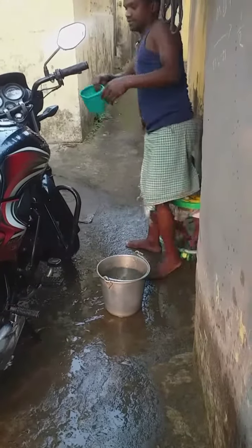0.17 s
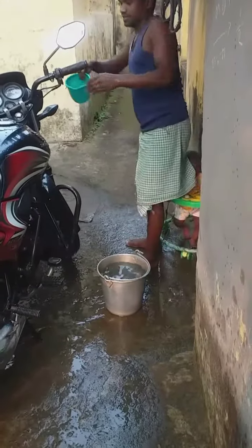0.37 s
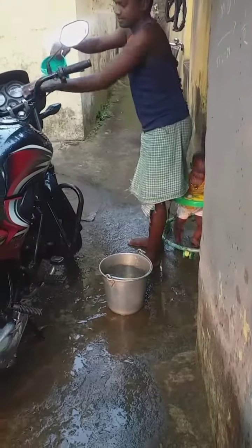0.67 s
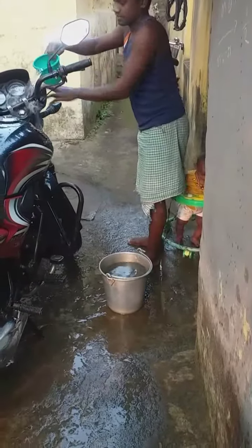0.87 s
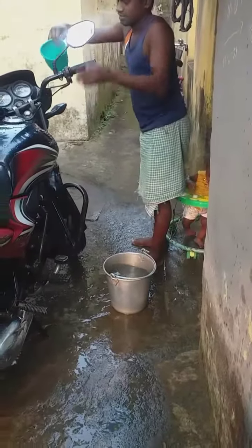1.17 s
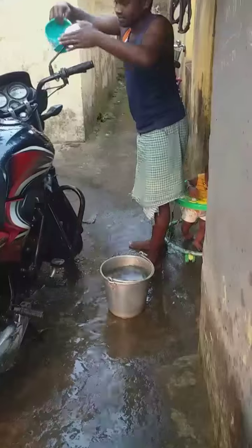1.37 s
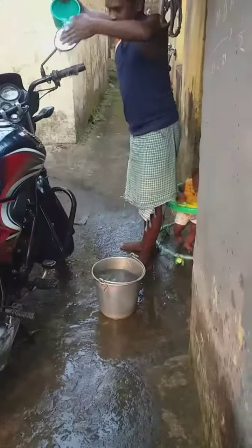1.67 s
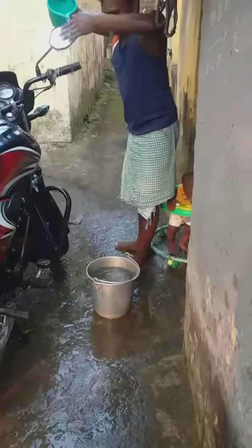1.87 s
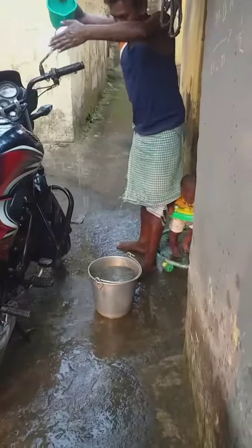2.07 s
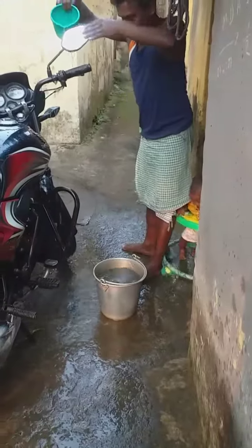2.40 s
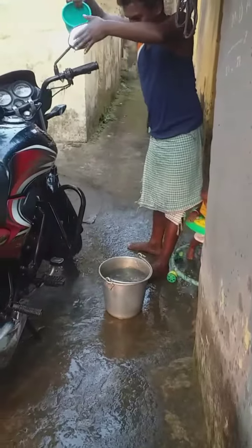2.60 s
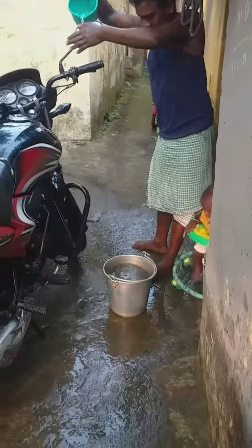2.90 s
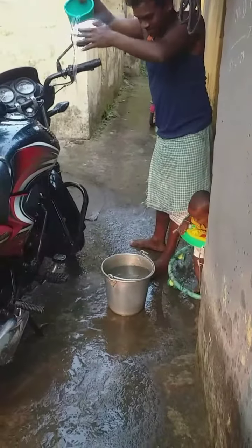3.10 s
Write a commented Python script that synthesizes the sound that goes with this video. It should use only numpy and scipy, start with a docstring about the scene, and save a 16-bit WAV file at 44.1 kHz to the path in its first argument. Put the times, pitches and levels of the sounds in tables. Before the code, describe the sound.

Water poured from a plastic mug splashes over a motorcycle in a narrow concrete alley. A light patter and a hollow plop come first, then sharper spattering, with a few faint squeaks of a wet hand on the mirror.

```python
"""A light patter, then a hollow plop: water is poured from a plastic mug over a motorcycle mirror.
Trapped air rings to make the plop; lumps and sheets of water slap and spatter on the bike and the
wet ground, while a wet hand sticks and slips on the glass in short squeaks. The walls of a narrow
concrete alley answer briefly over low outdoor air and a distant bird."""
import sys
import numpy as np
from scipy import signal
from scipy.fft import rfft, irfft, next_fast_len
from scipy.io import wavfile
from scipy.ndimage import map_coordinates

SR = 44100
rng = np.random.default_rng(int(sys.argv[2]) if len(sys.argv) > 2 else 0)


def materialize(psi):
    """Save the field psi as 16-bit PCM at rate SR to the path in sys.argv[1].

    A 1-D psi becomes a single channel; in a 2-D psi each row is a channel.
    """
    bounded = np.clip(np.atleast_2d(psi).T, -1, 1)
    quanta = np.round(bounded * 32767).astype(np.int16)
    wavfile.write(sys.argv[1], SR, quanta)


N = 143325
T = np.arange(N) / SR


def amp(db):
    """Decibels to gain."""
    return 10 ** (np.asarray(db) / 20)


def unit_rms(x):
    """Scale to rms 1."""
    return x / np.sqrt(np.mean(x ** 2) + 1e-20)


def log_interp(points, hz):
    """Read (freq_hz, value) points on a log frequency axis."""
    freqs_hz, values = np.transpose(points)
    return np.interp(np.log(hz + 1), np.log(freqs_hz + 1), values)


def curves(rows):
    """One value per sample for each column after time_s."""
    time_s, *columns = np.transpose(rows)
    return [np.interp(T, time_s, column) for column in columns]


def wobble(rate_hz, size=N):
    """Smooth random curve through rate_hz knots a second."""
    knots = rng.standard_normal(int(size * rate_hz / SR) + 4)
    return map_coordinates(knots, [np.arange(size) * rate_hz / SR])


def filtered(x, response):
    """Apply a frequency response, given as a function of Hz."""
    size = next_fast_len(len(x) + 8192)
    return irfft(rfft(x, size) * response(np.fft.rfftfreq(size, 1 / SR)), size)[:len(x)]


def coloured(x, spectrum):
    """Shape x by (freq_hz, gain_db) points, at rms 1."""
    return unit_rms(filtered(x, lambda hz: amp(log_interp(spectrum, hz))))


def band_noise(centre_hz, q, size):
    """Noise in one broad resonance with steepened skirts."""
    def response(hz):
        resonance = 1j * hz / (centre_hz ** 2 - hz ** 2 + 1j * hz * centre_hz / q)
        highpass = hz ** 2 / (hz ** 2 + (centre_hz / 2) ** 2)
        lowpass = 1 / np.hypot(1, hz / (1.48 * centre_hz))
        return resonance * highpass * lowpass

    return unit_rms(filtered(rng.standard_normal(size), response))


def grainy(x, depth_db, rate_hz):
    """Roughen x with a fast level flicker, at rms 1."""
    return unit_rms(x * amp(depth_db * wobble(rate_hz, len(x))))


def swell(t, rise_s, decay_s):
    """Smooth rise, exponential fall."""
    rise = np.sin(np.pi / 2 * np.minimum(t / rise_s, 1)) ** 2
    return rise * np.exp(-np.maximum(t - rise_s, 0) / decay_s)


def arch(progress):
    """Rounded envelope over progress 0 to 1."""
    return np.sqrt(np.abs(np.sin(np.pi * progress)))


def wavering_phase(pitch_hz, depth, rate_hz, size):
    """Phase in radians of a tone that wavers by a fraction of its pitch."""
    return 2 * np.pi * np.cumsum(pitch_hz * (1 + depth * wobble(rate_hz, size))) / SR


def add(out, start_s, x):
    """Mix x into out at start_s."""
    part = out[round(start_s * SR):][:len(x)]
    part += x[:len(part)]


# Wall reverberation: freq_hz, t60_s
ALLEY_DECAY = [(200, 0.49), (1000, 0.4), (4000, 0.3), (15000, 0.34)]


def alley(x, wet_db):
    """Direct sound plus the short answer of the concrete walls."""
    hz, t, noise = signal.stft(rng.standard_normal(SR // 2), SR, nperseg=256)
    decay = np.exp(-np.log(1000) * t / log_interp(ALLEY_DECAY, hz)[:, None])
    tail = signal.istft(noise * decay, SR, nperseg=256)[1]
    delayed = np.pad(x, (SR // 300, 0))
    return x + amp(wet_db) * signal.fftconvolve(delayed, tail / np.linalg.norm(tail))[:N]


# Outdoor air colour: freq_hz, gain_db
AIR_SPECTRUM = [(20, -46), (38, -36), (58, -10.5), (100, -5.5), (220, -2), (275, 0), (320, 9.5),
                (400, -2.5), (600, -11.5), (1500, -29), (5000, -50)]
# Outdoor air drift: time_s, relative_db
AIR_DRIFT = [(0.0, -59), (0.81, -56), (1.09, -59.5), (2.39, -55.5), (3.25, -58.5)]


def outdoor_air(gain_db=8, flutter_db=1.5):
    """Low background noise with a hollow ring."""
    drift_db, = curves(AIR_DRIFT)
    level_db = drift_db + gain_db + flutter_db * wobble(10)
    return amp(level_db) * coloured(rng.standard_normal(N), AIR_SPECTRUM)


# Bird calls: start_s, length_s, start_hz, end_hz, level_db
CHIRPS = [(0.458, 0.042, 6100, 5970, -44.5), (.585, 0.13, 2850, 2797, -43), (.725, 0.034, 3680, 3530, -40)]


def distant_bird():
    """Faint, thin whistles that fall slightly."""
    out = np.zeros(N)
    for start_s, length_s, start_hz, end_hz, level_db in CHIRPS:
        progress = np.linspace(0, 1, int(length_s * SR))
        pitch_hz = start_hz + (end_hz - start_hz) * progress
        phase = wavering_phase(pitch_hz, depth=0.0087, rate_hz=200, size=len(progress))
        add(out, start_s, amp(level_db) * arch(progress) * np.sin(phase))
    return out


# Hand on glass: start_s, length_s, start_hz, middle_hz, end_hz, first_db, second_db, third_db
SQUEAKS = [(1.348, .045, 1120, 1003, 842, -50, -51, -36), (1.837, 0.029, 848, 832, 760, -26.5, -47, -59),
           (2.195, 0.057, 592, 566, 575, -44, -44.5, -54), (2.254, .052, 657, 699, 556, -43.5, -31, -44.5),
           (2.298, .048, 563, 500, 410, -42, -30.5, -44), (3.02, 0.039, 1355, 1274, 1260, -39, -61, -60)]


def hand_squeaks():
    """Skin sticks and slips on wet glass in four harmonics; the pitch sags as the hand slows."""
    out = np.zeros(N)
    for start_s, length_s, start_hz, middle_hz, end_hz, first_db, second_db, third_db in SQUEAKS:
        progress = np.linspace(0, 1, int(length_s * SR))
        pitch_hz = np.interp(progress, [0, 0.5, 1], [start_hz, middle_hz, end_hz])
        phase = wavering_phase(pitch_hz, depth=0.026, rate_hz=290, size=len(progress))
        harmonics_db = [first_db, second_db, third_db, second_db - 7]
        tone = sum(amp(db) * np.sin(k * phase) for k, db in enumerate(harmonics_db, 1))
        add(out, start_s, arch(progress) * tone)
    return out


def droplets(per_s, low_hz, high_hz, decay_cycles, spread_db, ring_samples):
    """Random droplets, each a short ring that rises slightly in pitch."""
    when, pitch, strength = rng.random((int(per_s * N / SR), 3)).T[:, :, None]
    pitch_hz = low_hz * (high_hz / low_hz) ** pitch
    gain = amp(spread_db * np.minimum(-np.log(1 - strength), 4))
    cycles = pitch_hz * np.arange(ring_samples) / SR
    age = cycles / decay_cycles
    rings = gain * np.exp(-age) * np.sin(2 * np.pi * cycles * (1 + 0.021 * age))
    index = (when * N).astype(int) + np.arange(ring_samples)
    return unit_rms(np.bincount(index.ravel(), rings.ravel(), N + ring_samples)[:N])


# Running water, relative levels: time_s, patter_db, spray_db, gurgle_db
FLOW = [(0.0, -43.5, -50.5, -53), (0.28, -44.5, -51.5, -51), (0.42, -44, -61, -47), (0.63, -43, -51, -49),
        (0.79, -42, -60, -40.5), (0.96, -39.5, -44.5, -48), (1.1, -41.5, -47.5, -55.5),
        (1.33, -39, -48.5, -49), (1.54, -39.5, -38.5, -49), (1.79, -43, -43.5, -47),
        (2.03, -34.5, -38, -40), (2.19, -34, -38.5, -47), (2.33, -36, -40, -43), (2.49, -35.5, -36, -43.5),
        (2.66, -41.5, -39.5, -40), (2.85, -32.5, -40, -46.5), (3.1, -45, -48, -50),
        (3.25, -37.5, -40.5, -44.5)]
# Droplets against the wash, relative: time_s, prominence_db
DROP_PROMINENCE = [(0, -7), (1.3, -7), (1.4, -2.5), (3.25, -3.5)]
# Colour of each water layer: freq_hz, gain_db
PATTER_SPECTRUM = [(880, -11.5), (1500, -7.5), (2280, -3.5), (2760, -2), (3540, -1.5), (4560, 2.5),
                   (6890, -6.5), (8400, -9.5), (9240, -28), (10000, -16), (13000, -36), (22000, -120)]
SPRAY_SPECTRUM = [(4000, -28), (6000, 1), (7200, -9), (8300, 5), (9200, -7), (12000, 2), (15500, 0)]
GURGLE_SPECTRUM = [(200, -23), (330, 6.5), (450, -6), (700, 4.5), (1100, -3.5), (1900, 2), (3000, -13.5)]


def running_water():
    """Patter, fine spray and gurgle: droplets over a noise wash, standing out more during the pour."""
    patter_db, spray_db, gurgle_db = curves(FLOW)
    prominence_db, = curves(DROP_PROMINENCE)
    flutter_db = 1.7 * amp(prominence_db) * wobble(44.8)

    def wash(drops, spectrum, drops_db, trim_db):
        share = amp(drops_db + prominence_db)
        blend = (share * drops + rng.standard_normal(N)) / np.hypot(1, share)
        return amp(trim_db) * coloured(blend, spectrum)

    drops = droplets(per_s=800, low_hz=2480, high_hz=9270, decay_cycles=6.1, spread_db=4, ring_samples=400)
    patter = wash(drops, PATTER_SPECTRUM, drops_db=-2.5, trim_db=-3)
    fine = droplets(per_s=600, low_hz=7200, high_hz=15100, decay_cycles=1.5, spread_db=6,
                    ring_samples=100)
    spray = wash(fine, SPRAY_SPECTRUM, drops_db=-1, trim_db=-2.5)
    low = droplets(per_s=200, low_hz=396, high_hz=2004, decay_cycles=8, spread_db=3.5, ring_samples=2500)
    gurgle = wash(low, GURGLE_SPECTRUM, drops_db=-3.5, trim_db=-1)
    return (amp(patter_db + flutter_db) * patter
            + amp(spray_db + flutter_db + wobble(70)) * spray
            + amp(gurgle_db + 2.44 * wobble(18)) * gurgle)


# Air pockets in the water: start_s, pitch_hz, level_db, rise_s, decay_s
BUBBLES = [(.23, 396, -34.5, 0.015, 0.01), (.41, 732, -33.5, 0.0085, 0.023), (.57, 667, -34, 0.0047, .02),
           (.59, 790, -34, 0.008, 0.012), (.738, 706, -33.5, .008, 0.016),
           (.779, 1385, -21.5, 0.0082, 0.0049), (.781, 568, -22, 0.0031, 0.012),
           (.785, 381, -14.5, .014, 0.021), (.83, 385, -27.5, .03, .05), (.812, 372.7, -18.5, .011, 0.016),
           (.81, 806, -26.5, 0.0057, 0.019), (.812, 515, -27.5, 0.0083, .07),
           (.855, 1429, -26.5, 0.0051, 0.011), (.866, 1070, -23.5, 0.002, 0.012),
           (1.409, 1347, -34, 0.02, 0.013), (1.53, 310, -36.5, 0.0095, 0.012),
           (1.571, 1387, -34.5, 0.0074, 0.008), (1.591, 312, -38, 0.0069, 0.011),
           (1.962, 653, -30.5, 0.015, .014), (2.1, 1360, -32, .014, .012),
           (2.485, 1634, -31.5, 0.0052, 0.01), (2.5, 348, -39, 0.016, .04), (2.565, 809, -33, .006, .014),
           (2.63, 700, -39, 0.0075, 0.022), (2.685, 324.4, -33, 0.021, 0.031)]


def bubbles():
    """Trapped air rings with a wavering pitch; the largest pockets make the hollow plop."""
    out, t = np.zeros(N), np.arange(SR // 3) / SR
    for start_s, pitch_hz, level_db, rise_s, decay_s in BUBBLES:
        phase = wavering_phase(pitch_hz, depth=0.033, rate_hz=155, size=len(t))
        add(out, start_s, amp(level_db) * np.sin(phase) * swell(t, rise_s, decay_s))
    return out


# Soft sheets of water: start_s, level_db, rise_s, decay_s, centre_hz, q
SPLASHES = [(.19, -39.5, .004, 0.02, 3260, 2.1), (0.234, -47.5, 0.0046, 0.017, 990, 0.87),
            (0.309, -47, .008, 0.036, 2800, 1.2), (.42, -57, 0.055, 0.066, 5950, 4.5),
            (.46, -43, 0.0091, 0.044, 2000, 1.7), (0.631, -39.5, 0.0089, 0.015, 990, 2.2),
            (.78, -26, 0.0054, 0.026, 1080, 0.95), (.785, -33.5, 0.039, 0.065, 2930, 1.04),
            (.806, -38.5, .003, 0.023, 7640, 5.9), (0.854, -34, 0.0053, 0.067, 2660, 1.7),
            (1.11, -41, 0.025, 0.029, 5000, .8), (1.35, -35, 0.03, 0.082, 2600, 1.4),
            (1.74, -31, 0.013, .015, 4400, 0.85), (1.924, -25.5, 0.0073, 0.023, 4500, 1.7),
            (1.938, -31.5, 0.012, 0.03, 1980, 0.86), (2.091, -27, 0.016, 0.0077, 4000, 4.9),
            (2.17, -34.5, 0.034, 0.1, 6000, 0.52), (2.153, -29, 0.0037, 0.013, 1980, 3.3),
            (2.402, -31.5, 0.0068, 0.051, 2700, 0.75), (2.48, -47, 0.034, 0.081, 250, 0.92),
            (2.6, -38, .04, .04, 2010, 0.55), (2.84, -29.5, 0.018, 0.017, 3375, 0.97),
            (2.85, -33, 0.011, 0.056, 990, 0.5), (2.85, -36.5, 0.02, 0.036, 263, .7),
            (2.991, -31, .01, 0.02, 2940, 0.92), (3.125, -33, 0.024, 0.018, 2700, 4.3),
            (3.125, -39, 0.023, 0.017, 636, 0.85)]


def splashes():
    """Sheets of water swell and break up into grainy noise."""
    out, t = np.zeros(N), np.arange(SR // 3) / SR
    for start_s, level_db, rise_s, decay_s, centre_hz, q in SPLASHES:
        sheet = grainy(band_noise(centre_hz, q, len(t)), depth_db=2, rate_hz=602)
        add(out, start_s, amp(level_db) * sheet * swell(t, rise_s, decay_s))
    return out


# Lumps of water landing, relative levels: start_s, impact_db, pitch_hz, mist_db, splat_decay_ms
SLAPS = [(0.3382, -26.5, 2890, -49, 11.5), (0.811, -22, 3780, -46, 7.4), (0.9916, -24, 4030, -48, 7.9),
         (1.2736, -20.5, 8340, -19, 5.9), (1.3875, -12.5, 4840, -21, 7.3), (1.4006, -20, 5350, -16, 8.3),
         (1.4561, -13.5, 4350, -19.5, 15), (1.4918, -13, 4790, -39, 7), (1.518, -16.5, 3300, -24, 7),
         (1.5443, -22, 8010, -30, 6.2), (1.561, -14, 4450, -34, 11.3), (1.5746, -19.5, 8250, -21, 9.2),
         (1.6323, -21, 4740, -37, 4.2), (1.6629, -10, 4750, -34, 4.6), (1.6982, -10.5, 8600, -13.5, 5.9),
         (1.8159, -17.5, 5150, -25, 6), (1.86, -22, 4700, -31, 8), (1.877, -18.5, 4160, -17.5, 9.9),
         (2.0406, -15, 5840, -18.5, 7), (2.0693, -6.5, 3900, -35, 6.3), (2.111, -24, 4060, -39, 6.2),
         (2.1542, -8.5, 3180, -15, 8.4), (2.2064, -17, 4540, -21, 7.8), (2.2263, -16, 8220, -19, 5.3),
         (2.2426, -14.5, 6070, -19, 5.5), (2.3288, -12.5, 8480, -24, 4), (2.364, -21, 4750, -20, 5.6),
         (2.397, -6, 2790, -20, 8.7), (2.42, -29, 2790, -27, 6), (2.456, -18, 6300, -35, 8),
         (2.4616, -12, 4670, -35, 8.5), (2.4928, -21.5, 3280, -16.5, 10), (2.5383, -13, 4850, -52, 5.7),
         (2.6627, -9.5, 7760, -35, 6.6), (2.6999, -12.5, 4830, -23, 5.7), (2.7753, -23, 6260, -24, 11),
         (2.813, -21.5, 5440, -19.5, 11), (2.836, -10, 4100, -33, 7), (2.9407, -25, 4470, -23, 7),
         (3.0535, -27, 7350, -28, 7)]
# Colour of the thrown mist: freq_hz, gain_db
MIST_SPECTRUM = [(3500, -25), (6000, -3.5), (8000, 1), (9500, -7.5), (12000, 1.5), (15500, 0.5)]


def slaps(ping_trim_db=-4.5, splat_trim_db=-9.5, mist_trim_db=-6.5):
    """Each lump of water pings as it lands, bursts in the same band and throws off mist."""
    out, t = np.zeros(N), np.arange(SR // 10) / SR
    for start_s, impact_db, pitch_hz, mist_db, splat_decay_ms in SLAPS:
        ping = np.sin(2 * np.pi * pitch_hz * t)
        ping *= amp(impact_db + ping_trim_db) * swell(t, rise_s=0.00046, decay_s=2.5 / pitch_hz)
        splat = grainy(band_noise(pitch_hz, q=2.2, size=len(t)), depth_db=2, rate_hz=883)
        splat *= amp(impact_db + splat_trim_db) * swell(t, rise_s=0.001, decay_s=splat_decay_ms / 1000)
        mist = grainy(coloured(rng.standard_normal(len(t)), MIST_SPECTRUM), depth_db=2.5, rate_hz=1350)
        mist *= amp(mist_db + mist_trim_db) * swell(t, rise_s=0.0004, decay_s=0.0114)
        add(out, start_s, ping + splat + mist)
    return out


def scene():
    """Mono mix: short events echo off the walls; running water and air stay dry."""
    mix = (alley(slaps(), wet_db=-7)
           + alley(splashes(), wet_db=-6.5)
           + alley(bubbles() + hand_squeaks(), wet_db=-9.5)
           + alley(distant_bird(), wet_db=-4)
           + running_water() + outdoor_air())
    return mix[None]


def record(dry):
    """Thin the deepest bass and remove everything above the band limit."""
    low_cut_hz, top_hz = 47, 15950
    thinned = filtered(dry[0], lambda hz: 1 - 0.85 / (1 + (hz / low_cut_hz) ** 8))
    return filtered(thinned, lambda hz: np.clip((top_hz - hz) / 200 + 0.5, 0, 1))[None]


dry = scene()
out = record(dry)
materialize(out)
```